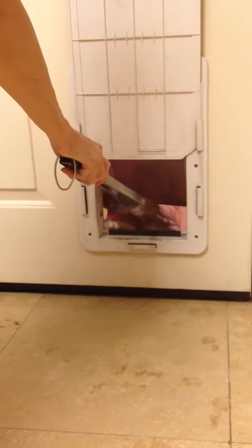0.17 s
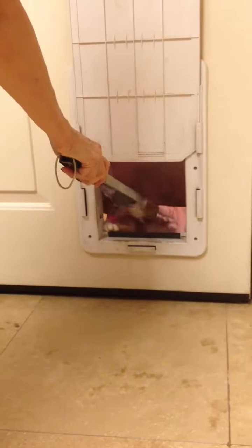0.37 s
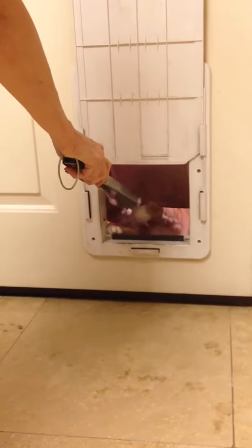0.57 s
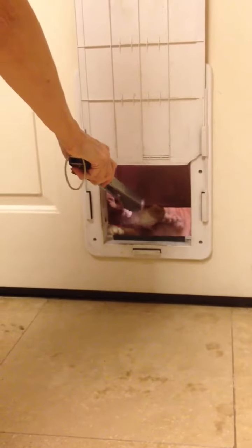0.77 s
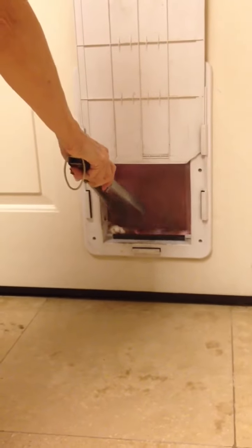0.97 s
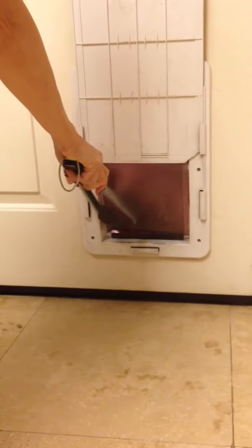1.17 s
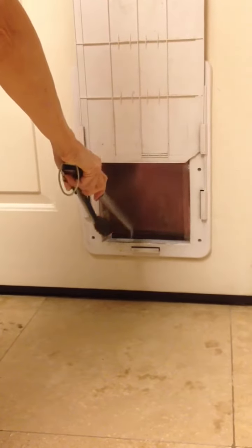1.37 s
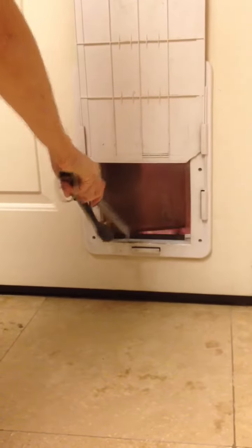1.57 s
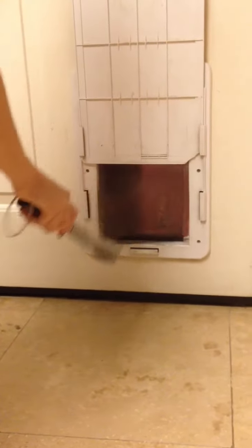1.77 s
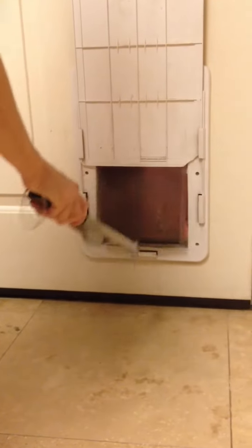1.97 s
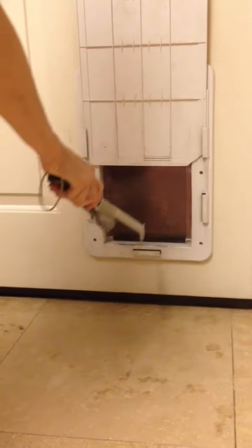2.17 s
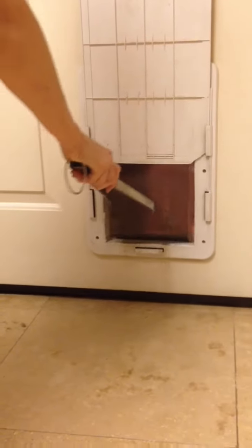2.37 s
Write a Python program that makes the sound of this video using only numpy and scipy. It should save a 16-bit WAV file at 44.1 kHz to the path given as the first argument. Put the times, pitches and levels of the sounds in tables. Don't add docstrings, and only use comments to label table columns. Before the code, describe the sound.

Metal tongs snap shut with bright clacks, then knock and scrape a plastic pet flap and its frame

```python
import sys
import numpy as np
from scipy import signal
from scipy.fft import rfft, irfft
from scipy.io import wavfile

SR = 44100
rng = np.random.default_rng(int(sys.argv[2]) if len(sys.argv) > 2 else 0)


def master_out(mix):
    frames = np.transpose(np.atleast_2d(mix))
    ceiling = np.clip(frames, -1, 1)
    pcm = np.round(ceiling * 32767).astype(np.int16)
    wavfile.write(sys.argv[1], SR, pcm)


def magnitude_from_level(level_db):
    exponent = np.asarray(level_db, float) / 20
    return 10 ** exponent


N = 110250

# f/Hz, density/dB per Hz
AIR_SPECTRUM = [(35, -49), (60, -30), (178, -9), (347, -8), (551, -16.5), (711, -15.5), (2420, -28),
                (15000, -36)]
AIR_RMS_DB = -61
# f/Hz, rms/dB
HUM_LINES = [(199.2, -69.5), (269.2, -72.5), (349.9, -67), (398.4, -91), (672.9, -73), (726.7, -74),
             (753.7, -83), (882.9, -79), (1055, -77), (1200, -78), (1405, -85.5), (1491, -106.5)]
HUM_WIDTH_HZ = 6

# f/Hz, t60/s
ROOM_T60 = [(150, 0.28), (600, 0.47), (1500, 0.17), (3000, 0.16), (6000, 0.24), (10000, 0.25),
            (15000, 0.24)]
ROOM_DB, ROOM_ONSET_S, ROOM_BUILD_S = -6, 0.00043, 0.0083
BASS_CUT_HZ = 145

# t/s, length/s, level/dB, thump/dB, brightness/dB per octave
SCRAPES = [(0.001, 0.034, -50.5, -8, -6.5), (0.112, 0.079, -56, -1, 0.5), (0.975, 0.065, -52.5, -35, 1),
           (1.163, 0.086, -42, -11, -2), (1.19, 0.16, -44.5, -14, -2), (1.317, 0.12, -43, -5.5, -2.5),
           (1.4194, 0.049, -40, -33, 3), (1.43, 0.13, -45.5, -22, -2), (0.922, 0.015, -69.5, -4, 6.5),
           (1.399, 0.028, -54, 15, 3.5), (1.527, 0.13, -52, -0.5, -0.4), (1.958, 0.049, -67.5, 3, 1.5),
           (2.332, 0.07, -52.5, -11, -2), (2.433, 0.033, -54, 4, -1.1)]
# t/s, peak/dB, thump/dB, click f/Hz, contact/s
KNOCKS = [(0.811, -63.5, 20, 1410, 0.0035), (.925, -60, 11, 2380, 0.0065),
          (1.1667, -44.5, -15, 1330, 0.0025), (1.177, -45, -20, 4500, 0.0027),
          (1.1834, -31.5, -18, 1680, 0.00046), (1.2019, -37.5, -9, 1540, 0.00044),
          (1.2018, -37, -4, 424, 0.00055), (1.2063, -47, -21, 494, 0.0004),
          (1.223, -46.5, -20, 1260, 0.00089), (1.235, -44, -20, 1010, 0.00073),
          (1.196, -53, -20, 1610, .002), (1.218, -52, -20, 1690, .002), (1.333, -40, -17, 1400, .002),
          (1.340, -44.5, -7, 503, 0.0015), (1.3432, -46, -12, 1310, .002), (1.364, -47, -17, 1390, 0.0023),
          (1.354, -42.5, -15, 1470, 0.002), (1.406, -52, 3, 4000, 0.0034), (1.4218, -32, -20, 1570, 0.0018),
          (1.4266, -30, -20, 685, 0.0031), (1.424, -31, -32, 1860, 0.0037), (1.431, -34, -13, 1520, 0.0035),
          (1.433, -43, -27, 5800, 0.0031), (1.441, -38.5, -6, 396, 0.0026), (1.438, -40, -20, 1890, 0.0049),
          (1.449, -39, -20, 1600, 0.0033), (1.445, -35, -26, 1350, 0.0027),
          (1.453, -36.5, -20, 1120, 0.0019), (1.58, -52.5, -20, 4530, .003),
          (1.907, -62, -14, 6900, 0.0033), (2.094, -59, -15.5, 2780, 0.0047),
          (2.233, -48, -39, 4080, 0.002), (2.3322, -38.5, -16, 1350, 0.00075),
          (2.3332, -49.5, -13, 4030, 0.0033), (2.437, -54.5, 7, 890, 0.0011), (2.448, -62, 3, 400, 0.0032),
          (2.465, -59, 6, 300, 0.0035), (0.987, -49.5, 4.5, 4500, 0.0062), (.056, -67, -20, 6100, 0.0018)]
# f/Hz, level/dB, t60/s
FLAP_MODES = [(645, -1.5, 0.036), (736, -1, 0.023), (1208, -4, 0.071), (1520, -9, 0.069),
              (1920, -3.5, 0.015), (2292, -11, 0.048), (2400, -31, 0.032)]
# f/Hz, level/dB, t60/s
PANEL_MODES = [(132, -23, 0.15), (208, 10.5, 0.02), (341, 4, 0.022), (460, -1.5, 0.05)]
# f/Hz, level/dB
GRIT_COLOUR = [(300, -24), (1000, -2.5), (2000, 0), (3200, -3), (4600, -5), (5600, -9.5), (9000, -12),
               (15000, -17.5)]
STRIKE_SPREAD_DB, FLAP_TICK_DB = 1.5, 7
GRITS_PER_S, GRIT_SPREAD_DB, SCRAPE_RISE = 4000, 2, 0.15
KNOCK_Q, KNOCK_TICK_DB, KNOCK_FLAP_DB, KNOCK_CHATTER = 2.2, -13, -11, .45

# t/s, peak/dB, ring/dB, brightness/dB per octave, shimmer/dB
TOUCHES = [
    (1.998, -43.5, -3, 1.5, 4.5),
    (2.355, -48, -8, -2.5, 10.5),
    (2.37, -51.5, -7, -1.5, 4),
]
# f/Hz, width/Hz, level/dB
TOUCH_BANDS = [(3010, 110, -1.5), (4760, 340, -18), (6260, 490, 14), (8000, 900, -5), (10900, 980, 10),
               (14000, 1200, 9)]
# f/Hz, level/dB, t60/s
ARM_MODES = [(3040, 0, .08), (3090, -5, .11), (4727, -3, .14), (4660, -6, .14), (5884, -4, .13),
             (6050, -6, .1), (6342, -6, .13), (6955, -9, .13), (10820, -7, .1)]
# t/s, peak/dB, ring/dB, brightness/dB per octave, shimmer/dB
CLACKS = [
    (0.1962, -20, -14, 2, 2.2),
    (0.742, -25.5, -15.5, 2, -2),
    (1.645, -21.5, -14, 1.16, -0.5),
]
# f/Hz, width/Hz, level/dB in clacks 1, 2, 3
SNAP_BANDS = [(1170, 300, -2, -3.5, -7), (2150, 350, -15, -16, -10.5), (3010, 220, -5.5, -2, -11.5),
              (3950, 500, 0.5, -2, 2), (4580, 210, -7, -7.5, -5.5), (5410, 450, -12, -5.5, 1),
              (6870, 480, -11, -6, -8), (7870, 360, -5, -5, -5.5), (9100, 650, -0.5, 1.5, -1.5),
              (10730, 450, -1.5, -0.5, -3), (12200, 600, -13, -12, -5), (15000, 770, -5, -2, -3)]
# f/Hz, t60/s, level/dB in clacks 1, 2, 3
STEEL_MODES = [(3082, 0.12, -4, -14, -12), (4080, 0.051, -6, -9, -6), (4562, 0.25, -0.5, -5.5, -10),
               (4650, 0.16, -7, -9, -11), (5500, 0.088, -8, -16, -9), (5440, .17, -9, -13, -8),
               (5495, .22, -5, -10, -3), (7120, 0.12, -10, -15, -3), (7860, 0.26, -4.5, -7, -6.5),
               (8118, 0.2, -10, -8, 0), (8290, 0.27, -4, -5, -12), (8800, 0.16, -8, -1, -8),
               (9450, .11, -9, -12, -6), (10630, 0.15, -10, -9, -3)]
# delay/s, level/dB
REBOUNDS = [(.0013, -4), (.009, -9), (.016, -10), (.026, -12), (.036, -16)]
# f/Hz, level/dB
SHEET_COLOUR = [(800, -16.5), (1200, -21), (2000, -16), (3000, -11), (4500, -5.5), (6000, -3.5), (9000, -1),
                (15000, 3)]
# f/Hz, t60/s
SHEET_T60 = [(1000, 0.39), (3000, 0.38), (6000, 0.22), (10000, 0.12), (15000, 0.063)]
SHEET_BUILD_S, SHEET_CROWD = .007, 0.13
SNAP_S, SNAP_CHATTER, SNAP_HISS_DB, SNAP_LOW_HZ = .0022, .6, -20, 900

EDGE_HZ, EDGE_LEAK_DB = 15250, -46


def evened(x):
    return x / np.sqrt(np.mean(x ** 2) + 1e-20)


def unit(x):
    return x / np.linalg.norm(x)


def read(points, hz):
    f, value = np.transpose(points)
    return np.interp(np.log(hz + 1), np.log(f + 1), value)


def add(mix, s, sound):
    part = mix[max(round(s * SR), 0):][:len(sound)]
    part += sound[:len(part)]


def causal(gain_db):
    log_gain = np.log(magnitude_from_level(gain_db))
    return np.fft.ifft(np.exp(np.conj(signal.hilbert(log_gain)))).real[:512]


def tilt(x, slope_db, pivot_hz):
    hz = abs(np.fft.fftfreq(1024, 1 / SR))
    octaves = np.log2(np.maximum(hz, 300) / pivot_hz)
    return signal.oaconvolve(x, causal(slope_db * octaves))[:len(x)]


def room_tone():
    hz = np.fft.rfftfreq(N, 1 / SR)
    z = rng.standard_normal((len(hz), 2))
    noise = irfft((z[:, 0] + 1j * z[:, 1]) * magnitude_from_level(read(AIR_SPECTRUM, hz)), N)
    tone = magnitude_from_level(AIR_RMS_DB) * evened(noise)
    t = np.arange(N) / SR
    slow = 1 / (1 + (hz / HUM_WIDTH_HZ) ** 4)
    for f, db in HUM_LINES:
        drift = evened(irfft(rfft(rng.standard_normal(N)) * slow, N))
        phase = 2 * np.pi * f * t + 0.57 * drift + 6 * rng.random()
        tone = tone + magnitude_from_level(db) * np.sqrt(2) * np.sin(phase)
    return tone


def room(x):
    taps = np.zeros(SR // 2)
    at = np.arange(0, len(taps) - 10, 10)
    taps[at + rng.integers(0, 10, len(at))] = rng.choice([-1., 1.], len(at))
    hz, t, z = signal.stft(taps, SR, nperseg=256)
    decay = magnitude_from_level(-60 * t / read(ROOM_T60, hz)[:, None])
    tail = signal.istft(z * decay, SR, nperseg=256)[1]
    tail = tail * np.clip((np.arange(len(tail)) / SR - ROOM_ONSET_S) / ROOM_BUILD_S, 0, 1)
    return signal.fftconvolve(x, unit(tail))[:N]


def modes(table, spread_db):
    t = np.arange(0, .4, 1 / SR)
    luck = rng.standard_normal((len(table), 2))
    total = np.zeros(len(t))
    for (hz, db, t60), (a, b) in zip(table, luck):
        envelope = magnitude_from_level(db + spread_db * a - 60 * t / max(t60, .0003))
        total += envelope * np.sin(2 * np.pi * hz * (1 + .002 * b) * t)
    return total


def contact(length_s, chatter):
    t = np.arange(0, .06, 1 / SR)
    envelope = np.minimum(t / 0.0019, 1) * np.exp(-t / max(length_s, .0002))
    force = chatter * unit(rng.standard_normal(len(t)) * envelope) * np.sqrt(length_s / 0.00061)
    force[30] += 1
    return unit(force)


def grit():
    return unit(causal(read(GRIT_COLOUR, abs(np.fft.fftfreq(1024, 1 / SR)))))


def plastic(force, thump_db, bright_db):
    body = unit(modes(FLAP_MODES, STRIKE_SPREAD_DB))
    body[:512] += magnitude_from_level(FLAP_TICK_DB) * grit()
    body = unit(body) + magnitude_from_level(thump_db) * unit(modes(PANEL_MODES, STRIKE_SPREAD_DB))
    return tilt(signal.oaconvolve(force, body), bright_db, 1180)


def scrape(s, length_s, level_db, thump_db, bright_db):
    u = np.arange(0, .3, 1 / SR) / length_s
    hit, size, sign = rng.random((len(u), 3)).T
    sizes = magnitude_from_level(-GRIT_SPREAD_DB * np.log(size + 0.0087))
    slips = (hit < GRITS_PER_S / SR) * sizes * np.sign(sign - .5)
    stroke = np.clip(np.minimum(u / SCRAPE_RISE, (1 - u) / (1 - SCRAPE_RISE)), 0, 1)
    return s, magnitude_from_level(level_db) * plastic(evened(slips) * stroke, thump_db, bright_db)


def knock(s, peak_db, thump_db, hz, contact_s):
    click_t60 = 2.2 * KNOCK_Q * np.sqrt(min(hz / 1200, 2)) / hz
    click = modes([(hz, 0, click_t60)], 0)
    click = unit(signal.fftconvolve(click, click[:512])[:len(click)])
    click[:512] += magnitude_from_level(KNOCK_TICK_DB) * grit()
    body = click + magnitude_from_level(KNOCK_FLAP_DB) * unit(modes(FLAP_MODES, STRIKE_SPREAD_DB))
    body = body + magnitude_from_level(thump_db) * unit(modes(PANEL_MODES, STRIKE_SPREAD_DB))
    force = contact(contact_s, KNOCK_CHATTER)
    return s - .0009, magnitude_from_level(peak_db) * 10 * signal.oaconvolve(force, body)


def sheet():
    hz, t, z = signal.stft(rng.standard_normal(18000), SR, nperseg=512)
    t60 = read(SHEET_T60, hz) * np.exp(SHEET_CROWD * rng.uniform(-1.8, 1, len(hz)))
    gain_db = read(SHEET_COLOUR, hz)[:, None] - 60 * t / t60[:, None]
    wash = signal.istft(z * magnitude_from_level(gain_db), SR, nperseg=512)[1]
    return wash / 3 * (1 - np.exp(-np.arange(len(wash)) / SR / SHEET_BUILD_S))


def swell(bands):
    t = np.arange(0, .4, 1 / SR)
    total = np.zeros(len(t))
    for k, (hz, width_hz, db) in enumerate(bands):
        rate = 5 * width_hz * t
        total += (-1) ** k * magnitude_from_level(db) * rate * np.exp(-rate) * np.sin(2 * np.pi * hz * t)
    return total


def clack(s, peak_db, ring_db, bright_db, sheet_db, bands, steel):
    snap = swell(bands)
    snap[0] += magnitude_from_level(SNAP_HISS_DB)
    force = np.pad(contact(SNAP_S, SNAP_CHATTER), (0, 3000))
    for delay_s, db in REBOUNDS:
        add(force, delay_s, magnitude_from_level(db) * contact(SNAP_S, SNAP_CHATTER))
    high_pass = signal.butter(2, SNAP_LOW_HZ, "high", fs=SR, output="sos")
    blow = signal.sosfilt(high_pass, signal.oaconvolve(force, snap))
    ring = modes(steel, 0)
    n = len(ring)
    ring = magnitude_from_level(ring_db) * ring / 3 * np.minimum(np.arange(n) / 80, 1)
    sound = 4 * unit(blow)[:n] + ring + magnitude_from_level(sheet_db) * sheet()[:n]
    return s - .001, 2 * magnitude_from_level(peak_db) * tilt(sound, bright_db, 3060)


def scene():
    sounds = []
    for k, row in enumerate(CLACKS):
        bands = [(hz, width_hz, db[k]) for hz, width_hz, *db in SNAP_BANDS]
        steel = [(hz, db[k], t60) for hz, t60, *db in STEEL_MODES]
        sounds.append(clack(*row, bands, steel))
    sounds += [clack(*row, TOUCH_BANDS, ARM_MODES) for row in TOUCHES]
    sounds += [knock(*row) for row in KNOCKS]
    sounds += [scrape(*row) for row in SCRAPES]
    paths = np.zeros((3, N))
    for k, (s, sound) in enumerate(sounds):
        add(paths[k % 3], s, sound)
    blows = paths.sum(0) + magnitude_from_level(ROOM_DB) * sum(room(p) for p in paths)
    bass_cut = signal.butter(4, BASS_CUT_HZ, "high", fs=SR, output="sos")
    return (signal.sosfilt(bass_cut, blows) + room_tone())[None]


def low_pass(x):
    return signal.sosfilt(signal.butter(12, 16530, fs=SR, output="sos"), x)


def record(dry):
    edge = signal.firwin(511, EDGE_HZ, window=("kaiser", 8), fs=SR)
    low = signal.oaconvolve(dry, edge[None], "same")
    return low_pass(low + magnitude_from_level(EDGE_LEAK_DB) * (dry - low))


dry = scene()
out = record(dry)
master_out(out)
```